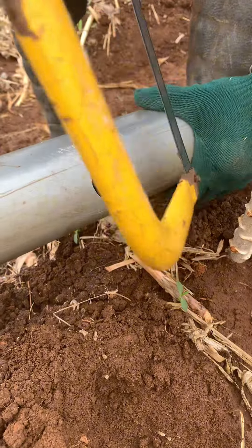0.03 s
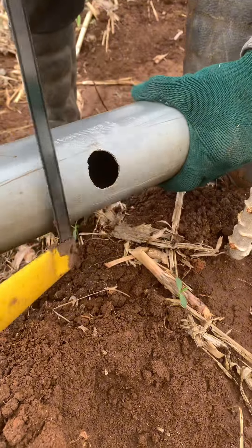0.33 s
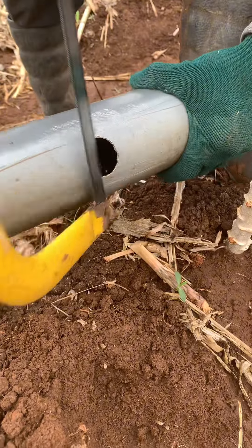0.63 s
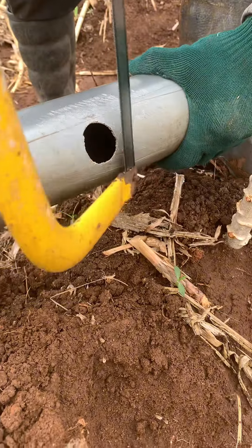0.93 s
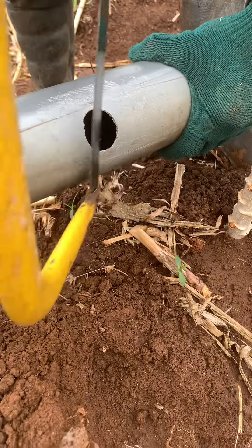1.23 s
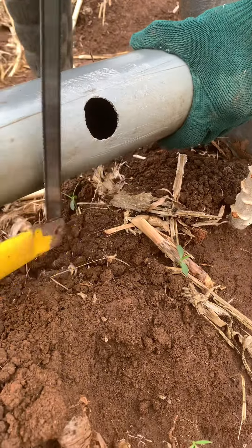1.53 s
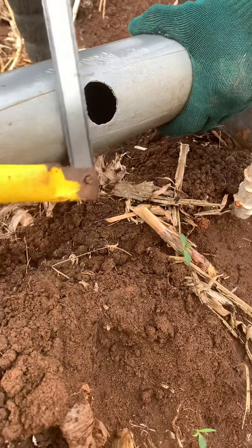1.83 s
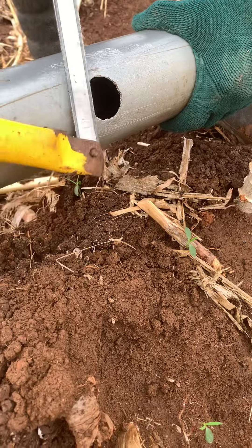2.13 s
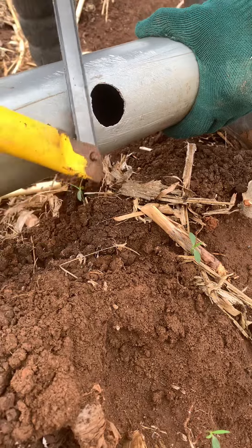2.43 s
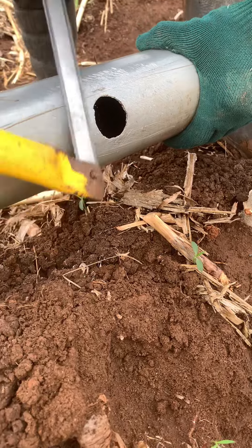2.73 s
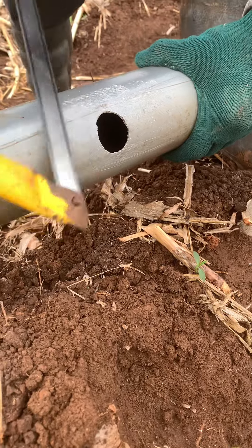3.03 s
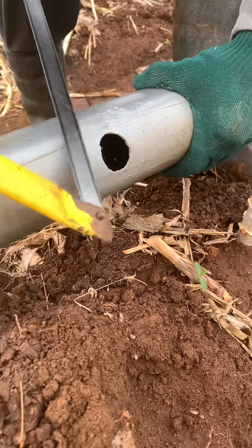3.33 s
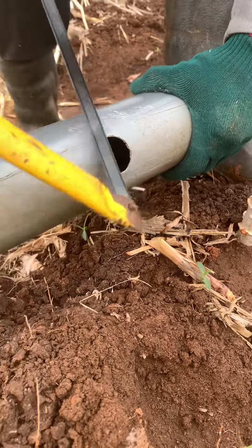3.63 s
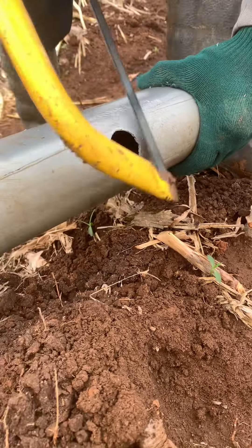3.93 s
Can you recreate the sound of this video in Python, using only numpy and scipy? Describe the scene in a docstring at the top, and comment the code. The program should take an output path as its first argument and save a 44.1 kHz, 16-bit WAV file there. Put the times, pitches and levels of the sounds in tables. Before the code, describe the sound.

A hand saw cuts a plastic pipe close by, outdoors. For the first 1.8 seconds the blade is set down five times with a hollow knock, each followed by a short rasp. At about 1.5 seconds it slips off with a high metallic ring. From 1.9 to 4 seconds it rasps back and forth in quick, steady strokes with tiny squeaks and clicks. Wind and handling rumble faintly underneath.

```python
"""Outdoors, close to a plastic pipe held on the ground, a bow saw starts a cut. Five times the blade
is set down with a knock and pushed across; once it slips off and rings in its free modes. Then it
runs back and forth in the groove in quick, steady strokes. Each tooth tears off a chip, and this
train of impulses drives the resonances of pipe and blade; a tooth that catches makes the blade
squeak. Wind and handling rumble faintly. Two microphone ports pick up the sound."""
import sys
import numpy as np
from scipy import signal
from scipy.fft import rfft, irfft
from scipy.io import wavfile
from scipy.ndimage import uniform_filter1d

SR = 44100
rng = np.random.default_rng(int(sys.argv[2]) if len(sys.argv) > 2 else 0)


def dump_mix(stems):
    """Bounce the given channels to the path in sys.argv[1] as a 16-bit WAV at rate SR."""
    frames = np.atleast_2d(stems).T  # one column per channel
    limited = np.clip(frames, -1, 1)  # hard clip at full scale
    pcm = np.round(limited * 32767).astype(np.int16)
    wavfile.write(sys.argv[1], SR, pcm)


N = 176400


def amp(db):
    """Amplitude ratio of a level in decibels."""
    return 10 ** (np.asarray(db) / 20)


def unit_rms(x):
    """Normalisation to unit mean power."""
    return x / np.sqrt(np.mean(x ** 2) + 1e-20)


def curve_at(points, hz):
    """Interpolation on a logarithmic frequency axis."""
    point_hz, value = np.transpose(points)
    return np.interp(np.log(hz + 1), np.log(point_hz + 1), value)


def add(mix, start_s, sound):
    """Superposition of a sound on the mix, from a given time."""
    part = mix[..., max(round(start_s * SR), 0):][..., :sound.shape[-1]]
    part += sound[..., :part.shape[-1]]


def wander(size, cutoff_hz):
    """Random fluctuation: low-pass noise of rms 1."""
    hz = np.fft.rfftfreq(size, 1 / SR)
    spectrum = rfft(rng.standard_normal(size)) / np.sqrt(1 + (hz / cutoff_hz) ** 4)
    return unit_rms(irfft(spectrum, size))


def colour(x, spectrum, size=2048):
    """Minimum-phase filtering that conserves the power of white noise."""
    log_gain = np.log(amp(curve_at(spectrum, abs(np.fft.fftfreq(size, 1 / SR)))))
    taps = np.fft.ifft(np.exp(np.conj(signal.hilbert(log_gain)))).real
    return signal.oaconvolve(x, taps[None] / np.linalg.norm(taps), axes=1)[:, :x.shape[1]]


def damped_modes(modes, t):
    """Free vibration: a sum of decaying sines, in two versions of unrelated phase."""
    return sum(amp(db - 60 * t / t60_s) * np.sin(2 * np.pi * (hz * t + rng.random((2, 1))))
               for hz, db, t60_s in modes)


def crack(db, rise_s, t60_s):
    """Impact transient: white noise with a linear rise and an exponential decay."""
    t = np.arange(0, .1, 1 / SR)
    return amp(db - 60 * t / t60_s) * np.minimum(t / rise_s, 1) * rng.standard_normal((2, len(t)))


# Envelopes of the rumble and of the open air: time_s, relative_level_db
RUMBLE_ENVELOPE = [(0, -38.5), (0.069, -68), (.2, -46), (.33, -47), (.5, -60.5), (.68, -44), (.85, -59.5),
                   (1.04, -43.5), (1.2, -50.5), (1.29, -51), (1.36, -43), (1.42, -66), (1.7, -69),
                   (1.8, -44.5), (1.95, -56), (2.15, -77), (2.77, -73.5), (2.84, -43.5), (2.9, -65),
                   (2.99, -46), (3.08, -62), (3.189, -44.5), (3.35, -62), (3.46, -61), (3.52, -37.5),
                   (3.6, -64), (3.7, -35.5), (3.77, -47.5), (3.85, -38), (4, -39.5)]
AIR_ENVELOPE = [(0, -66), (0.498, -67.5), (1.3, -63), (1.55, -75.5), (1.73, -71.5), (2.05, -62), (4, -61)]
# Their spectra: frequency_hz, relative_density_db
RUMBLE_SPECTRUM = [(20, -23.5), (42, -2), (75, 0), (115, -5), (170, -14.5), (300, -25), (800, -49.5)]
AIR_SPECTRUM = [(30, -9.5), (130, -3.5), (320, -2.5), (700, -10.5), (1500, -16.5), (3500, -17.5),
                (7000, -22.5), (15000, -48.5)]

def wind_and_handling():
    """Ambient noise: gusts and handling give low pressure fluctuations over quiet open air."""
    t = np.arange(N) / SR
    rumble_db = np.interp(t, *np.transpose(RUMBLE_ENVELOPE)) - 4.5
    air_db = np.interp(t, *np.transpose(AIR_ENVELOPE))
    rumble = colour(rng.standard_normal((2, N)), RUMBLE_SPECTRUM, size=8192)
    air = colour(rng.standard_normal((2, N)), AIR_SPECTRUM)
    return amp(rumble_db) * rumble + amp(air_db) * air


# Modes of the free blade: pitch_hz, relative_level_db, t60_s
BLADE_MODES = [(5685, 7, 0.21), (6750, -19.5, .073), (7450, -22.5, .065)]
# The blade is let go: start_s, gain_db
RELEASES = [(0.355, -46.5), (0.738, -50), (1.477, -22.5), (1.94, -35.5)]

def free_blade():
    """Free vibration: the released blade rings in its modes; slipping off, it gives a falling zing."""
    out, t = np.zeros((2, N)), np.arange(0, .4, 1 / SR)
    attack = np.minimum(t / .0025, 1)
    for start_s, db in RELEASES:
        add(out[0], start_s, amp(db) * attack * damped_modes(BLADE_MODES, t)[0])
    slip_s, zing_hz, first_octave_s, t60_s = 1.505, 5100, .125, .22
    cycles = np.cumsum(zing_hz / (1 + t / first_octave_s)) / SR
    zing = amp(-47 - 60 * t / t60_s) * np.sin(2 * np.pi * cycles)
    for version in out:
        add(version, slip_s, zing * wander(len(t), cutoff_hz=300))
    return out


# The pipe wall shudders under the blade: start_s, length_s, level_db, pitch_hz
SHUDDERS = [(0.189, 0.25, -47, 288.5), (.3, .028, -28.5, 629), (0.651, 0.072, -40.5, 629),
            (1.411, 0.06, -45, 660), (1.766, 0.09, -50, 249), (3.893, 0.069, -40.5, 343)]

def wall_shudders():
    """Random excitation of a resonance: the pipe wall answers with a short, rough swell."""
    out = np.zeros((2, N))
    for start_s, length_s, db, hz in SHUDDERS:
        t = np.arange(0, length_s, 1 / SR)
        resonance = signal.iirpeak(hz, Q=16, fs=SR)
        groan = signal.lfilter(*resonance, rng.standard_normal((2, SR)))[:, -len(t):]
        swell = amp(db) * np.sin(np.pi * t / length_s)
        add(out, start_s, swell * np.array([unit_rms(version) for version in groan]))
    return out


# A chip breaks off: start_s, level_db
SNAPS = [(0.276, -38), (.297, -27.5), (0.303, -30), (.652, -32), (.667, -25), (0.672, -26.5), (1.365, -36),
         (2.777, -28), (2.794, -32.5), (3.408, -31), (3.433, -42), (3.665, -35)]
# Spectrum of the break: frequency_hz, relative_density_db
SNAP_SPECTRUM = [(200, -31.5), (900, -7.5), (1500, -0.5), (2300, 0), (3300, -4.5), (5000, -15.5),
                 (9000, -27)]

def chip_snaps():
    """Fracture: a chip of plastic snapping off under a tooth radiates a broadband click."""
    out = np.zeros((2, N))
    for start_s, db in SNAPS:
        add(out, start_s, crack(db, rise_s=.00054, t60_s=.036))
    return colour(out, SNAP_SPECTRUM)


# Air column of the pipe: pitch_hz, relative_level_db, t60_s
AIR_COLUMN_MODES = [(105, -10, .2), (274, -8.5, 0.43), (300.5, -13.5, 1), (451.2, -5, 0.24),
                    (618, -5.5, .12)]
# Spectra of the plastic's clack and the steel's tick and hiss: frequency_hz, relative_density_db
CLACK_SPECTRUM = [(150, -12.5), (450, -3), (850, -2.5), (1100, -8), (1450, 4), (2050, 2), (2700, -8),
                  (3400, 0), (4600, -11), (8000, -29.5)]
STEEL_SPECTRUM = [(3000, -38), (5100, -8), (5700, -2), (6300, 1), (7400, -2.5), (9000, -3), (11300, -5.5),
                  (13200, -8), (14600, -21), (15700, -19)]
# The blade lands or bounces, with relative levels: start_s, thump_db, clack_db, tick_db
KNOCKS = [(.166, -29.5, -31, -32), (.196, -42, -46, -54.5), (0.208, -56.5, -51, -45),
          (0.215, -36.5, -36.5, -44), (.576, -32.5, -38, -44), (.599, -34.5, -38, -39.5),
          (.939, -31, -33, -29.5), (.96, -42.5, -40.5, -41.5), (1.321, -67.5, -45, -38),
          (1.755, -45, -48.5, -50.5), (1.783, -38.5, -51.5, -69.5)]

def knocks():
    """Impact excitation: steel ticks, plastic clacks, the wall thumps and the air column rings."""
    low, clacks, ticks = np.zeros((3, 2, N))
    t = np.arange(0, .5, 1 / SR)
    # Bending waves are dispersive: low frequencies arrive last, so the thump falls in pitch.
    first_hz, last_hz, glide_s, delay_s, t60_s = 501, 84.5, .0046, .00426, .08
    cycles = np.cumsum(last_hz + (first_hz - last_hz) * np.exp(-t / glide_s)) / SR
    thump = np.sin(2 * np.pi * cycles) * np.minimum(t / .013, 1) * amp(-60 * t / t60_s)
    for start_s, thump_db, clack_db, tick_db in KNOCKS:
        hollow_ring = amp(thump_db - 7.5) * damped_modes(AIR_COLUMN_MODES, t)
        add(low, start_s + delay_s, amp(thump_db + 9) * thump + hollow_ring)
        add(clacks, start_s, crack(clack_db + 6, rise_s=.0025, t60_s=.062))
        add(ticks, start_s, crack(tick_db + 4, rise_s=.0013, t60_s=.041))
    return low + colour(clacks, CLACK_SPECTRUM) + colour(ticks, STEEL_SPECTRUM)


# A tooth catches: start_s, length_s, level_db, pitch_hz
CATCHES = [(.294, 0.008, -18, 7720), (0.332, 0.019, -23, 7000), (0.345, 0.015, -25, 6010),
           (0.353, 0.012, -30.5, 4050), (0.67, 0.017, -23, 5867), (0.712, 0.03, -28, 6300),
           (1.016, 0.023, -24, 7670), (1.094, 0.019, -29, 7250), (1.158, 0.0097, -28, 7000),
           (1.391, 0.0124, -24.5, 7340), (1.463, 0.037, -23.5, 5860), (2.249, 0.013, -28.5, 4470),
           (2.256, 0.0114, -27, 6500), (2.496, 0.013, -38, 4100), (2.531, 0.021, -22.5, 6370),
           (2.755, 0.011, -26.5, 6100), (2.783, 0.0077, -41, 6750), (3.028, 0.012, -26, 6670),
           (3.152, .0099, -30, 7570), (3.203, 0.017, -29.5, 7010), (3.31, 0.015, -26, 7300),
           (3.579, 0.012, -30, 7400), (3.822, 0.011, -31.5, 8100), (3.961, 0.012, -31, 7400)]

def squeaks(waver_hz=530):
    """Friction-induced vibration: where a tooth catches, the blade gives a brief wavering tone."""
    out = np.zeros((2, N))
    for start_s, length_s, db, hz in CATCHES:
        t = np.arange(0, length_s, 1 / SR)
        drift = np.array([wander(16384, waver_hz)[:len(t)] for _ in range(2)])
        cycles = np.cumsum(hz + waver_hz * drift, axis=1) / SR + rng.random((2, 1))
        swell = amp(db) * np.sqrt(2) * np.sin(np.pi * t / length_s)
        add(out, start_s, swell * np.sin(2 * np.pi * cycles))
    return out


def tooth_pulses(speed, full_speed_hz=620, jitter=.35, spread_db=3.5, decay_s=.0007):
    """Impulse train: teeth tear off chips unevenly, at a rate proportional to the blade's speed."""
    rate_hz = full_speed_hz * speed * np.exp(jitter * wander(len(speed), full_speed_hz))
    teeth_passed = np.floor(np.cumsum(rate_hz) / SR)
    strength = amp(spread_db * np.clip(rng.standard_normal(len(speed)), -2, 2))
    hits = (np.diff(teeth_passed, prepend=0) > 0) * strength
    return unit_rms(signal.lfilter([1], [1, -np.exp(-1 / (SR * decay_s))], hits))


def friction_noise(travel, spacing_hz=180, glide_hz=260, chatter_hz=350, chatter_s=.024):
    """Time-varying filtering: resonances glide as the blade travels; patches flare as it chatters."""
    frames = dict(fs=SR, nperseg=512, noverlap=384)
    hz, t, spectra = signal.stft(rng.standard_normal((2, len(travel))), **frames)
    peaks_hz = np.arange(0, SR, spacing_hz)
    peaks_db = 7 * np.clip(rng.standard_normal(len(peaks_hz)), -2, 1.5)
    shift_hz = glide_hz * np.interp(t * SR, np.arange(len(travel)), travel)
    gliding_db = np.interp(hz[:, None] + shift_hz, peaks_hz, peaks_db)
    patches = uniform_filter1d(rng.standard_normal(spectra.shape), round(chatter_hz / hz[1]), axis=0)
    patches = unit_rms(uniform_filter1d(patches, round(chatter_s / t[1]), axis=1))
    chatter_db = 4 * np.clip(patches, -2, 2)
    gain = unit_rms(amp(gliding_db + chatter_db))
    return signal.istft(spectra * gain, **frames)[1][:, :len(travel)]


# Resonances of pipe and blade: centre_hz, bandwidth_hz, gain_db
BODY_RESONANCES = [(286, 4.8, 4), (335, 37, 4), (447, 6.2, 11.5), (637, 45, 7), (1100, 47, 9.5),
                   (1342, 24, 8.5), (4367, 120, 6), (5766, 14, 10), (5890, 30, 7.5), (6230, 25, 7.5),
                   (7060, 28, 4), (7155, 50, -1), (7660, 20, 3.5), (8100, 48, 7.5)]

def body_resonance(x):
    """Forced vibration: the teeth keep the fixed resonances of pipe and blade ringing."""
    return x + sum((amp(db) - 1) * signal.lfilter(*signal.iirpeak(hz, hz / width_hz, SR), x)
                   for hz, width_hz, db in BODY_RESONANCES)


# Spectrum of the pipe's rasp: frequency_hz, relative_density_db
RASP_SPECTRUM = [(60, -28), (200, -26), (370, -12), (520, -13), (650, -5), (900, -7.5), (1150, -1),
                 (1600, 2), (2300, 2.5), (3100, -1), (4700, -7), (8000, -32)]
# How strongly each voice follows the blade's speed: rasp_factor, bite_factor, hiss_factor
SPEED_SENSITIVITY = (0.59, 0.83, 1.0)
# Steady rubbing relative to the tooth pulses: rasp_ratio, bite_ratio, hiss_ratio
RUBBING = (.75, 1.2, 1.6)
# Saw strokes, with relative levels:
# full_speed_at_s, hold_s, rise_s, fall_s, rasp_db, bite_db, hiss_db, bite_pitch_hz
STROKES = [(0.256, 0.049, .056, .012, -38.5, -42.5, -31.5, 4090),
           (.295, 0.053, 0.0059, 0.034, -36, -50, -23.5, 3500),
           (0.408, .004, .013, .027, -60, -48, -51.5, 3800),
           (0.665, .055, .048, .038, -36.5, -39, -21, 3780),
           (0.794, 0.011, 0.024, 0.029, -59.5, -82, -60.5, 3460),
           (0.985, 0.0046, .028, .047, -44.5, -47, -39.5, 4200),
           (1.024, .128, .022, 0.025, -38, -38, -25.5, 4020),
           (1.222, 0.014, 0.029, .025, -51, -62, -51, 3516),
           (1.392, .086, 0.038, 0.039, -36.5, -45.5, -24, 2760),
           (1.864, .039, .009, .073, -38.5, -37, -30, 2500),
           (1.914, 0.027, 0.025, 0.031, -41.5, -32.5, -24.5, 4360),
           (2.039, 0.0074, 0.049, 0.026, -50, -58, -44, 2770),
           (2.115, 0.0063, 0.0053, 0.02, -41.5, -35, -26, 4150),
           (2.203, .03, 0.0093, .015, -43, -42, -36.5, 4490),
           (2.25, 0.046, 0.044, .02, -38.5, -32, -23.5, 4200),
           (2.386, 0.038, 0.047, 0.035, -39.5, -45, -37.5, 4130),
           (2.508, 0.06045, 0.015, 0.029, -40.5, -34, -25, 4300),
           (2.627, .058, 0.023, .027, -38.5, -46.5, -37, 4170),
           (2.758, .057, .015, .026, -35.5, -39.5, -24.5, 4420),
           (2.875, 0.075, .027, 0.028, -35, -52, -35, 2280),
           (3.027, .055, .022, 0.042, -39.5, -42.5, -27.5, 3990),
           (3.158, 0.061, .027, 0.027, -36.5, -42.5, -32, 3780),
           (3.302, .05, .033, 0.02165, -37, -41, -29, 2620),
           (3.412, 0.054, 0.028, .023, -37, -35.5, -31.5, 2790),
           (3.544, 0.037, 0.032, 0.061, -34.5, -51, -31.5, 4330),
           (3.673, 0.059, 0.038, 0.019, -40, -50, -37.5, 2530),
           (3.784, 0.059, 0.02, 0.031, -38.5, -50, -37, 3960),
           (3.92, .089, .04, 0.039, -41.5, -42.5, -38.5, 4200)]

def sawing():
    """Amplitude modulation: tooth pulses drive the wall's rasp, the chip's bite and the steel's hiss."""
    voices = np.zeros((3, 2, N))
    for full_speed_at_s, hold_s, rise_s, fall_s, *levels_db, bite_hz in STROKES:
        t = np.arange(-2 * rise_s, hold_s + 2.5 * fall_s, 1 / SR)
        drive_db = -20 * (np.maximum(-t, 0) / rise_s + np.maximum(t - hold_s, 0) / fall_s)
        speed = amp(drive_db / 2)
        pulses = tooth_pulses(speed)
        travel = np.cumsum(speed) / speed.sum() - .5
        rasp, bite, hiss = (friction_noise(travel) for _ in voices)
        chip_resonance = signal.iirpeak(bite_hz, Q=2.5, fs=SR)
        bite = unit_rms(signal.lfilter(*chip_resonance, signal.lfilter(*chip_resonance, bite)))
        for i, noise in enumerate((rasp, bite, hiss)):
            pressure_db = 1.5 * wander(len(t), cutoff_hz=70)  # uneven pressure on the blade
            grip = (RUBBING[i] + pulses) * amp(pressure_db)
            grip /= np.sqrt(np.average(grip ** 2, weights=speed ** 2))
            envelope = amp(levels_db[i] + SPEED_SENSITIVITY[i] * drive_db)
            add(voices[i], full_speed_at_s + t[0], noise * grip * envelope)
    rasp, bite, hiss = voices
    return body_resonance(amp(-1) * colour(rasp, RASP_SPECTRUM) + amp(-1.5) * bite
                          + amp(-2.5) * colour(hiss, STEEL_SPECTRUM))


# Likeness of the two microphone ports: frequency_hz, unclipped_coherence
PORT_COHERENCE = [(200, 1), (550, 2.54), (1000, -0.44), (1600, 1.08), (2600, 0.2), (3300, 0), (4500, 0.78),
                  (5600, 0.63), (6900, 1.34), (8300, 2.7), (15000, 4.13)]
# Their phase difference above the bass: frequency_hz, left_lead_rad
PORT_PHASE = [(300, -.5), (450, -1.2), (650, -1.74), (850, -1.36), (1400, .5), (2200, 0), (3000, -2),
              (3900, .93), (5000, -3), (6400, -.5), (7500, 0), (9500, 3), (10200, 3.5), (11900, 6.28),
              (13200, 8), (14200, 8.5)]
# Their level difference above the bass: frequency_hz, left_minus_right_db
PORT_BALANCE = [(500, 0.5), (1100, -2.5), (1400, 0.5), (2500, -3), (3200, 1), (3550, 2.5), (4050, 4.5),
                (4650, -3.5), (5700, 4), (6500, 0)]

def microphone_ports(versions, scatter=.05):
    """Partial coherence: two independent versions of a sound combine into left and right."""
    hz = np.fft.rfftfreq(N, 1 / SR)
    first, second = rfft(versions)
    above_bass = np.clip(hz / 280 - 1, 0, 1)
    coherence = np.clip(curve_at(PORT_COHERENCE, hz), 0, 1 - above_bass * scatter)
    balance = amp(above_bass * curve_at(PORT_BALANCE, hz))
    shared = first * np.sqrt((1 + coherence) / 2)
    apart = second * np.sqrt((1 - coherence) / 2)
    left = (shared + apart) * balance
    right = (shared - apart) * np.exp(-1j * above_bass * curve_at(PORT_PHASE, hz))
    return irfft(np.array([left, right]) * np.sqrt(2 / (1 + balance ** 2)), N)


def scene():
    """Superposition: all sources add at the microphone."""
    saw_and_pipe = sawing() + squeaks() + knocks() + chip_snaps() + wall_shudders() + free_blade()
    return microphone_ports(saw_and_pipe + wind_and_handling())


def record(dry):
    """Band limiting: a linear-phase low-pass filter removes the highest treble."""
    cutoff_hz = 15800
    taps = signal.firwin(511, cutoff_hz, window=("kaiser", 9), fs=SR)
    return signal.oaconvolve(dry, taps[None], "same")


dry = scene()
out = record(dry)
dump_mix(out)
```